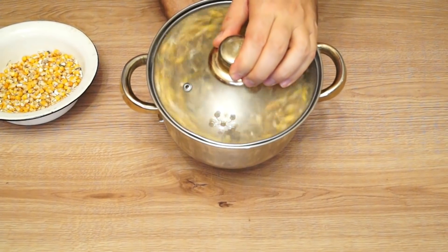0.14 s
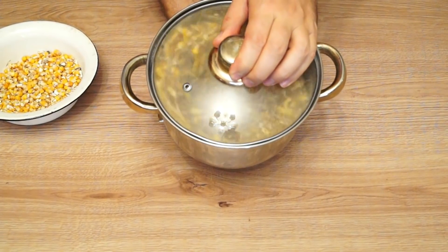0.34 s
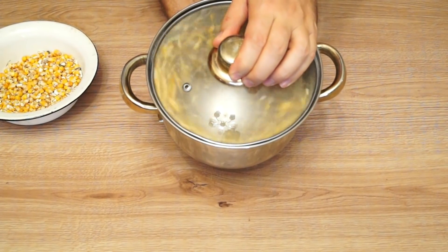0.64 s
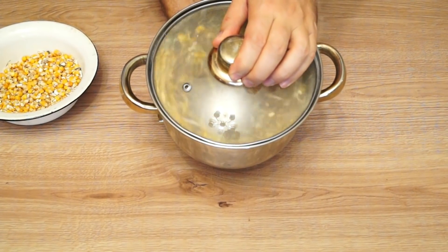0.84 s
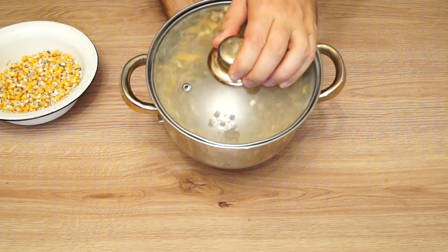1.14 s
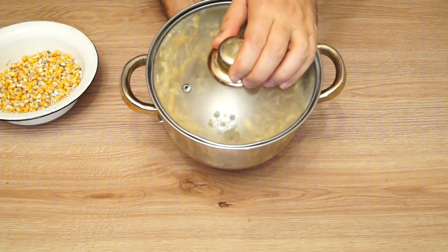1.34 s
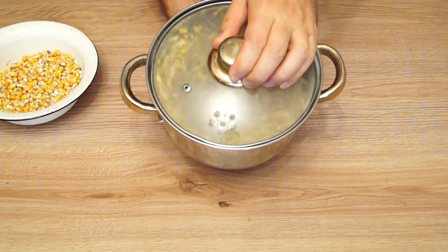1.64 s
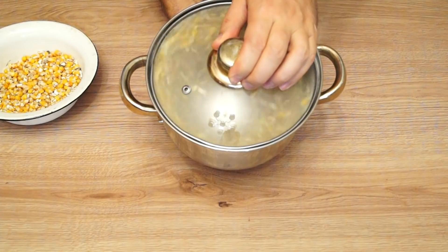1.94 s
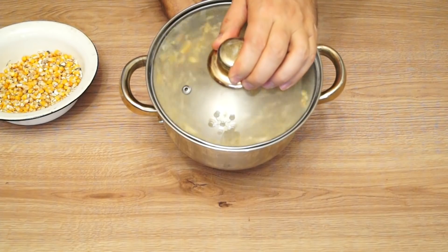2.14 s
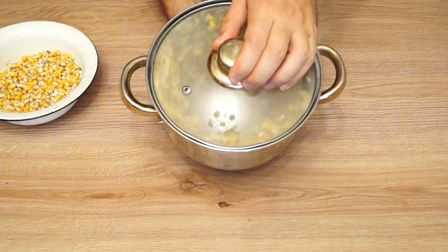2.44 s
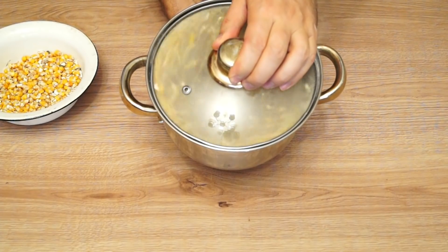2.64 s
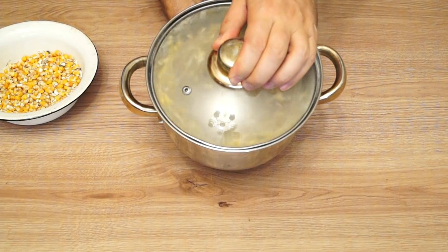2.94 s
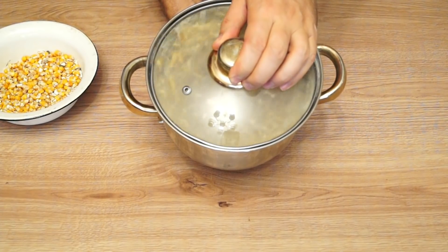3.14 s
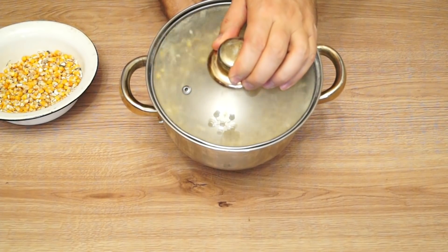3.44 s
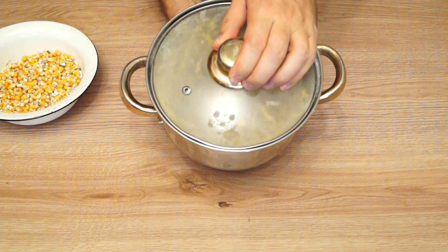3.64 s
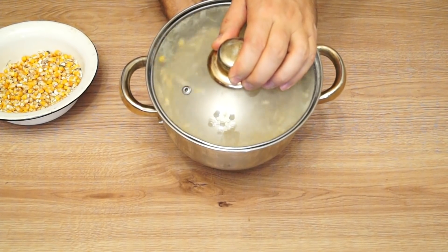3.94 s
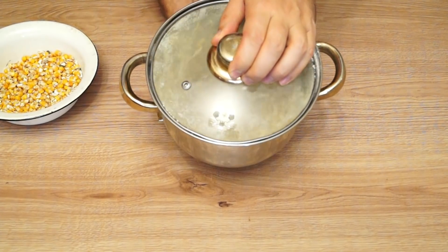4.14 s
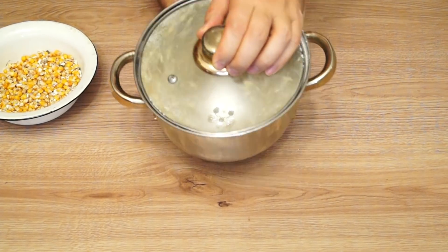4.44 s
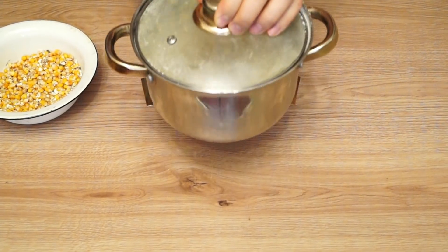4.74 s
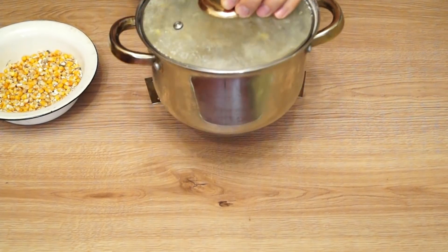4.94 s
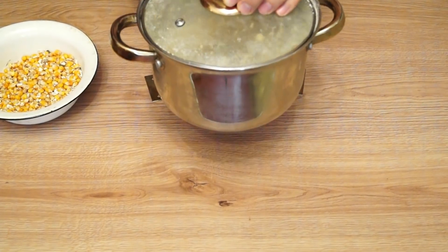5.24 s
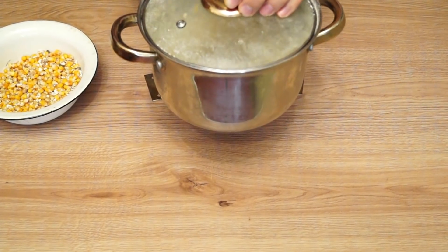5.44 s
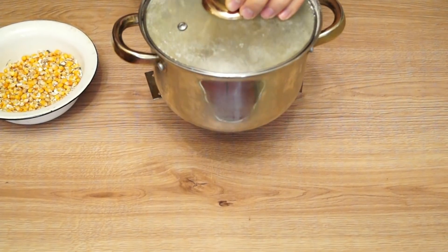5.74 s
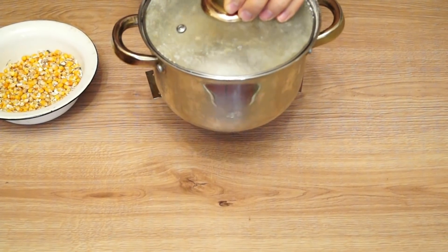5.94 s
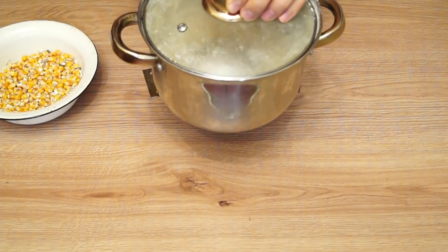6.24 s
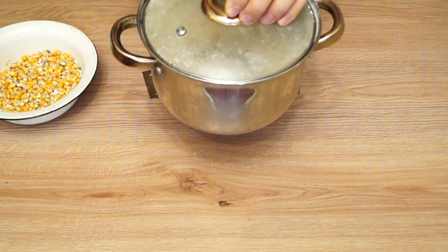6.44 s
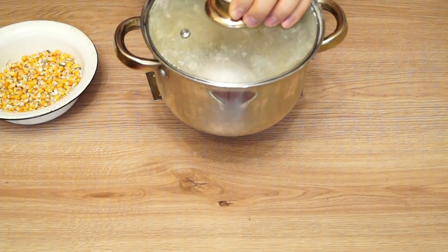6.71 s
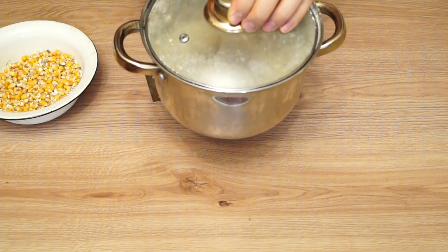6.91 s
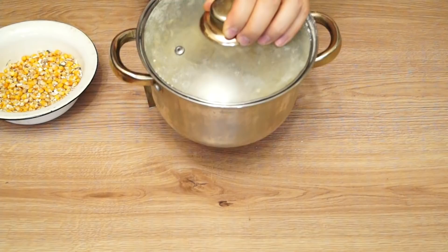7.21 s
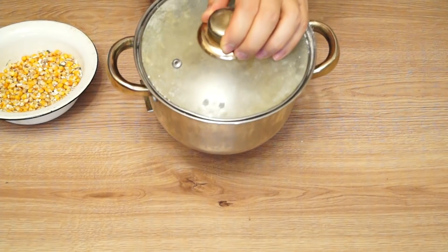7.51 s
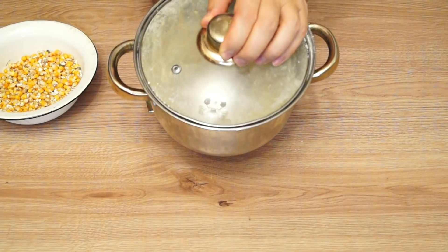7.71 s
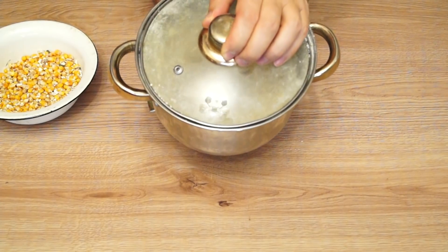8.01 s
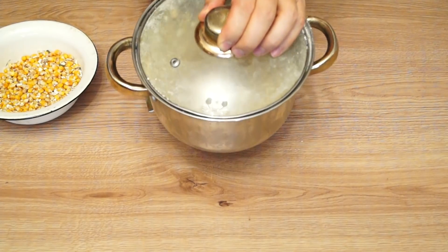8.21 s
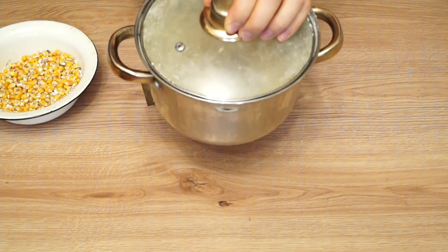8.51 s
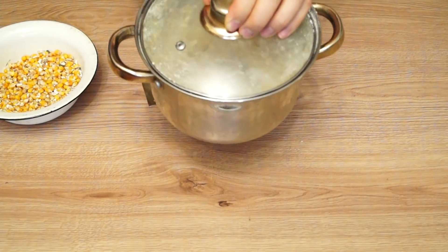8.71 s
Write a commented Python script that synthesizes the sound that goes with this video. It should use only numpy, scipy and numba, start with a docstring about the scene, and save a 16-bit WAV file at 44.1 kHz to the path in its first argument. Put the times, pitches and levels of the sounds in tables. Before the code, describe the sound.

Close up in a small room, a fast motorized blade whirls dry corn inside a lidded steel pot. Dense, bright crackling surges and dips in quick clumps, with hard ticks on metal. At about four seconds it abruptly changes to finer, duller grinding hiss, while the steel sings louder and the motor whine stands out, wavering until the end.

```python
"""In a small room, close by, an angle grinder spins a blade inside a lidded steel pot and mills dry corn. Whole
kernels surge round the wall with a bright, dense crackle; at about 4 s the scene changes to a load of fine
grit, where the steel sings out louder and the crackle dulls. Each layer of the load is a hail of random impacts
filtered by the pot's resonances. The motor's whine is a sum of drifting sines; swells, knocks, a ping and a low
hum are narrow-band noise, and dull bumps are decaying sines."""
import sys
import numpy as np
from scipy import signal
from scipy.fft import rfft, irfft
from scipy.io import wavfile
from numba import njit

SR = 44100
rng = np.random.default_rng(int(sys.argv[2]) if len(sys.argv) > 2 else 0)


def master(y):
    """Save y as 16-bit WAV."""
    cut = np.clip(np.atleast_2d(y).T, -1, 1)
    pcm = np.round(cut * 32767)  # scale
    wavfile.write(sys.argv[1], SR, pcm.astype(np.int16))


N = 391166

TIME = np.arange(N) / SR
SIZE = 16384  # samples in a filter response
FREQ = np.maximum(np.arange(SIZE // 2 + 1) * SR / SIZE, 1)
GRIT_FROM_S = 4.043
# crossovers between the frequency ranges of the layers
DRUM_HZ, SING_LO_HZ, SING_HI_HZ, CRACKLE_HZ, LID_HZ = 450, 2150, 3100, 5200, 9900


def undb(db):
    """Level definition: decibels become an amplitude ratio."""
    return 10 ** (np.asarray(db) / 20)


def unit(x):
    """Normalisation: the mean of the two ears gets rms 1."""
    return x / np.sqrt(np.mean(x.mean(axis=0) ** 2))


def curves(table):
    """Linear interpolation: the columns of a table become curves over time."""
    s, *columns = np.transpose(table)
    return [np.interp(TIME, s, column) for column in columns]


def over_freq(hz, values):
    """Logarithmic frequency scale: points are joined by straight lines on it."""
    return np.interp(np.log(FREQ), np.log(hz), values)


def walk(rate):
    """Band-limited noise: smooth chance with spread 1 that changes about rate times a second."""
    hz = np.arange(N // 2 + 1) * SR / N
    shape = (hz / rate) / (1 + (hz / rate) ** 2) ** 2
    x = irfft(rfft(rng.standard_normal(N)) * shape, N)
    return x / x.std()


def humps(table):
    """Smooth modulation: each event adds one raised-cosine hump; returns dB over time."""
    total_db = 0
    for s, length, db in table:
        phase = np.pi * np.clip((TIME - s) / length, -.5, .5)
        total_db = total_db + db * np.cos(phase) ** 2
    return total_db


def zone(lo_hz, hi_hz):
    """Crossover filtering: gain of the range between two soft edges."""
    above_lo = 1 / (1 + (lo_hz / FREQ) ** 16)
    below_hi = 1 / (1 + (FREQ / hi_hz) ** 16)
    return np.sqrt(above_lo * below_hi)


# Broad colour of the impacts. Columns: f/Hz, level with kernels/dB, level with grit/dB
COLOUR = [(30.2, -45, -43), (102, -34, -34.5), (191, -30, -24), (495, -18, -12), (1020, -19.5, -13.5),
          (1580, -13.5, -7.5), (1800, -14, -9.5), (2520, -14, -6.5), (3220, -16, -3), (4710, -10.5, -3),
          (5120, -12, -8), (9500, -3, -7), (10070, -4, -12), (15500, -3.5, -14.5)]
# Resonances of pot, lid and enclosed air.
# Columns: f/Hz, width/Hz, lift with kernels/dB, lift with grit/dB
MODES = [(200.5, 60, 10.5, 6.5), (324.5, 56, 11.5, 5), (406, 17, 10, 10), (617, 31, 3.5, 7.5),
         (554, 41, 1, 1), (686, 31, 4.5, 0.5), (855, 31, 6, 4.5), (1123, 55, 8, 8.5), (1239, 13, 6.5, 10),
         (1636, 120, -0.5, 1.5), (1970, 29, 4, 6), (2158, 55, 7.5, 8), (2304, 69, 9.5, 12),
         (2376, 50, 4, 3), (2516, 55, 2, 3.5), (2574, 156, 6.5, 8.5), (2785, 56, 4, 9.5), (2987, 42, 8, 8),
         (3140, 110, 7.5, 5.5), (3597, 21, -1, 8), (3840, 74, 4.5, 2.5), (4360, 14, 10, 12),
         (4800, 14, -4, 13), (9370, 860, 4, 0.5)]


def pot_gain(load):
    """Modal superposition: resonant peaks stand on a broad colour, for load 0 (kernels) or 1 (grit)."""
    colour = np.transpose(COLOUR)
    db = over_freq(colour[0], colour[1 + load])
    for hz, width, *lift in MODES:
        db = db + lift[load] / (1 + (2 * (FREQ - hz) / width) ** 2)
    return undb(db)


def ring(x, gain):
    """Minimum-phase response: causal filtering with this gain, so that resonances ring after each hit."""
    cepstrum = irfft(np.log(gain / gain.max() + 1e-5))
    # folding the cepstrum onto positive time makes the response causal
    cepstrum[1:SIZE // 2] *= 2
    cepstrum[SIZE // 2 + 1:] = 0
    response = irfft(np.exp(rfft(cepstrum)))
    return signal.oaconvolve(x, response)[:N]


def hail(rate, scatter_db, force_db, t60, direct=0., lag_s=.0007):
    """Shot noise: echoes of wall and lid smear random hits into short bursts, unlike in the two ears."""
    hit = rng.random(N) < rate / SR
    scatter = np.clip(rng.standard_normal(N), -2, 2)
    size = hit * undb(force_db + scatter_db * scatter)
    # energy kept from sample to sample
    keep = np.exp(-np.log(10 ** 6) / (t60 * SR))
    energy = signal.lfilter([1 - keep], [1, -keep], size ** 2 + 1e-18)
    bursts = np.sqrt(energy) * rng.standard_normal((2, N))
    # the first click itself reaches the right ear a little later
    clicks = size * rng.choice([-1, 1], N)
    return bursts + direct * np.array([clicks, np.roll(clicks, int(lag_s * SR))])


# Balance of the ears over frequency. Columns: f/Hz, left minus right level/dB
LEAN = [(100, 3.5), (300, 3), (600, 3), (1100, 0.3), (2500, 1), (4500, -0.5), (12000, -1.5)]


def radiate(impacts, gain):
    """Resonant radiation: the pot colours the impacts; its low tones lean to the left."""
    lean_db = over_freq(*np.transpose(LEAN))
    ears = [gain * undb(sign * lean_db / 2) for sign in (1, -1)]
    return unit(np.array([g.max() * ring(x, g) for x, g in zip(impacts, ears)]))


@njit
def band(x, hz, width):
    """State-variable filtering: a band-pass whose centre can move."""
    y, b, l = np.empty(len(x)), 0., 0.
    for i in range(len(x)):
        g, k = np.tan(np.pi * hz[i] / SR), width / hz[i]
        v = (b + g * (x[i] - l)) / (1 + g * (g + k))
        b, l, y[i] = 2 * v - b, l + 2 * g * v, k * v
    return y


def wander(x, centre_hz, width_hz, spread=.03, rate=14):
    """Moving excitation: contacts move over the steel, so the band that they excite drifts."""
    hz = centre_hz * (1 + spread * walk(rate))
    return unit(np.array([band(ear, hz, float(width_hz)) for ear in x]))


def waver(x, depth_s=0.00013, rate=6):
    """Delay modulation: the whirling load keeps pulling the resonances slightly out of tune."""
    when = TIME + depth_s * walk(rate)
    return np.array([np.interp(when, TIME, ear) for ear in x])


# Clumps of the load hit the wall. Columns: t/s, length/s, rise in level/dB
SURGES = [(.34, 0.058, 2), (.92, 0.18, 2), (1.13, 0.05, 2), (1.225, .06, 1.5), (1.63, 0.065, 2),
          (1.72, 0.098, 2), (1.85, 0.065, 1.5), (1.95, 0.048, 2), (2.08, .04, 0.5), (2.17, .05, 2),
          (2.28, 0.29, 1), (2.55, 0.055, 3), (2.94, 0.1, 4), (3.03, 0.23, 3), (3.125, 0.078, 1),
          (3.355, 0.077, 2.5), (3.46, 0.11, 2.5), (3.588, 0.048, 3), (3.68, .06, 2.5), (3.94, .16, 1),
          (4.57, 0.13, 1), (5.14, 0.16, 3.5), (5.88, 0.12, 2.5), (7.16, 0.19, 2.5), (7.38, 0.076, 4.5),
          (8.07, .08, 1.5)]
# The blade runs through a gap in the load. Columns: t/s, length/s, change in level/dB
LULLS = [(.165, 0.08, -3), (.56, 0.08, -3.5), (.735, 0.15, -3.2), (1.07, 0.1, -2.5), (1.18, 0.034, -0.5),
         (1.3, 0.049, -4), (1.38, 0.06, -3.5), (1.46, 0.054, -3.5), (1.59, 0.042, -1.5), (1.8, .04, -2),
         (1.895, 0.035, -3), (2.05, 0.051, -1.5), (2.118, 0.059, -4), (2.585, 0.13, -5), (2.72, 0.25, -2),
         (3.22, 0.17, -1.5), (3.405, .06, -5), (3.618, 0.049, -5), (3.835, 0.04, -1), (5.44, 0.065, -2),
         (8.14, 0.098, -1), (8.52, .12, -4)]


def flow():
    """Fluctuating mass flow: how much of the load strikes the pot, in dB about its usual amount."""
    return humps(SURGES) + humps(LULLS)


# Hard bits make the steel sing out. Columns: t/s, length/s, rise in level/dB
BURSTS = [(4.95, 0.076, 2.5), (6.23, 0.062, 4.5), (6.75, 0.065, 2), (7.47, 0.14, 2.5), (8, 0.22, 1.5)]
# The steel loses contact and its song breaks off. Columns: t/s, length/s, change in level/dB
BREAKS = [(4.31, 0.051, -5), (4.5, 0.066, -4), (4.885, 0.042, -9), (7.38, 0.048, -11), (7.84, .1, -4),
          (8.15, 0.063, -8), (8.72, .1, -5), (8.83, 0.15, -5)]


def contact():
    """Contact excitation: how firmly hard bits bear on the steel, in dB about the usual."""
    return humps(BURSTS) + humps(BREAKS)


RIPPLE_HZ = 100  # mains ripple in the motor's torque
WHINE_WOBBLE_HZ, WHINE_ROUGH = 3.5, 0.3  # spread of the pitch; irregular part of each path
WHINE_FLUTTER_DB, WHINE_FLUTTER_RATE = 2.5, 6  # level flutter, and its changes per second
WHINE_CONTACT_SHARE = 0.54  # part of a burst or break of the steel that the whine shares
# The whine sags under load; the pot lets through now the tone, now its lower side tone.
# Columns: t/s, f/Hz, tone level/dB, lower side tone level/dB (before flutter and contact)
WHINE = [(0, 2310, -59, -70), (.5, 2312, -58.5, -72), (.82, 2360, -58, -72), (1.22, 2360, -50, -58),
         (1.7, 2433, -55, -57), (2, 2364, -55, -64), (2.5, 2383, -52, -60), (2.8, 2370, -52, -64),
         (3.08, 2410, -53, -62), (3.3, 2387, -52, -53), (3.95, 2376, -50, -57), (4.03, 2384, -55, -56),
         (4.06, 2500, -41, -47), (4.4, 2500, -43, -53), (4.6, 2452, -46, -51), (4.95, 2437, -45, -44),
         (5.3, 2456, -47, -49), (5.45, 2473, -44, -48), (5.8, 2493, -43, -41), (6.07, 2472, -47, -38),
         (6.32, 2495, -40, -52), (6.75, 2483, -38, -49), (6.93, 2480, -41, -48), (7.36, 2486, -45, -42),
         (7.45, 2483, -39, -42), (7.68, 2482, -37, -53), (7.92, 2475, -39.5, -48), (8.3, 2505, -40, -46),
         (8.48, 2494, -42.5, -45), (8.6, 2476, -50, -50)]
# Further faint side tones. Columns: distance from the tone/ripple steps, level re the tone/dB
SIDE_TONES = [(1, -12.5), (2, -15), (3, -7)]


def motor():
    """Modulation sidebands: mains ripple flanks the whine with tones, carried unlike to each ear."""
    pitch_hz, tone_db, lower_db = curves(WHINE)
    pitch_hz = pitch_hz + WHINE_WOBBLE_HZ * walk(12.2)
    tones = [(0, tone_db), (-1, lower_db)]
    tones += [(step, tone_db + db) for step, db in SIDE_TONES]
    out = 0
    for step, db in tones:
        phase = 2 * np.pi * np.cumsum(pitch_hz + round(step) * RIPPLE_HZ) / SR
        paths = []
        for _ in range(2):
            rough = walk(7.5) + 1j * walk(11)
            paths.append(np.exp(0.7j * walk(1.0)) + WHINE_ROUGH * rough)
        out = out + undb(db) * np.real(np.array(paths) * np.exp(1j * phase))
    flutter_db = WHINE_FLUTTER_DB * np.clip(walk(WHINE_FLUTTER_RATE), -2, 1)
    return out * undb(WHINE_CONTACT_SHARE * contact() + flutter_db)


# reference levels: the wall rings louder as kernels break, while the crackle slowly thins
WALL_DB, WALL_DB_PER_S = -47.5, 0.84
CRACKLE_DB, CRACKLE_DB_PER_S = -34, -0.25
CRACKLE_LULL_SHARE, CRACKLE_SURGE_SHARE = 0.81, 0.34  # parts of lulls and surges in the crackle
WALL_FLOW_SHARE = 0.5  # extra part of a surge or lull felt by the wall's low modes
WHIRL_DB, WHIRL_RATE = 0.5, 11  # the load whirls unevenly: spread of the level, changes per second
# the ring climbs as kernels break into lighter pieces
RING_HZ, RING_HZ_PER_S = 2500, 20
# Short rises and dips of the bright crackle's level. Columns: t/s, length/s, change in level/dB
CRACKLE_CHANGES = [(.56, .1, 1.5), (.79, .06, 2), (1.12, 0.08, -3), (2.44, 0.068, -1), (2.59, 0.069, 3.5),
                   (2.7, 0.2, 2), (2.895, 0.087, -4), (3.07, 0.089, -3.5), (3.17, 0.17, 2.5),
                   (3.44, 0.083, -3.5), (3.775, .04, -3)]


def kernels():
    """Impact excitation: kernels fly at the wall in clumps, ring it low and high, and split with a crack."""
    wall_db = WALL_DB + WALL_DB_PER_S * TIME + flow() + WHIRL_DB * walk(WHIRL_RATE)
    crackle_db = CRACKLE_DB + CRACKLE_DB_PER_S * TIME + humps(CRACKLE_CHANGES)
    crackle_db += CRACKLE_LULL_SHARE * humps(LULLS) + CRACKLE_SURGE_SHARE * humps(SURGES)
    pot = pot_gain(0)

    blows = hail(rate=2000, scatter_db=1, force_db=1. * walk(26), t60=0.07, direct=0.35)
    blows = radiate(blows, pot * zone(DRUM_HZ, SING_LO_HZ))
    blows *= undb(wall_db - 7.5 + WALL_FLOW_SHARE * flow())

    rings = hail(rate=1300, scatter_db=1.0, force_db=1.8 * walk(10), t60=0.012, direct=0.46)
    rings = waver(radiate(rings, pot * zone(SING_LO_HZ, SING_HI_HZ)))
    rings = wander(rings, RING_HZ + RING_HZ_PER_S * TIME, width_hz=290, spread=0.043)
    rings *= undb(wall_db - 7.5)

    ticks = hail(rate=4600, scatter_db=-2.5, force_db=1.3 * walk(9.7), t60=0.11, direct=0.42)
    ticks = waver(radiate(ticks, pot * zone(SING_HI_HZ, CRACKLE_HZ)), depth_s=.0001)
    ticks *= undb(wall_db - 0.5)

    cracks = hail(rate=7000, scatter_db=3, force_db=.35 * walk(22), t60=.02)
    cracks = radiate(cracks, pot * zone(CRACKLE_HZ, SR)) * undb(crackle_db)
    return drum(pot) + hard_hits(pot) + blows + rings + ticks + cracks


# drumming on the base grows slowly with kernels, steps up at the grit, then holds
DRUM_DB, DRUM_DB_PER_S, DRUM_GRIT_DB = -66, 0.55, -60.5
DRUM_SURGE_SHARE = 0.64  # part of a surge or lull that reaches the base
# Heavy clumps drum on the base. Columns: t/s, length/s, rise in level/dB
THUDS = [(.72, .07, 3), (.89, .07, 0), (1.33, 0.052, 2), (2.26, .08, 7), (2.94, 0.11, 13), (3.5, .07, 1),
         (4.08, 0.057, 5), (4.17, 0.077, 9), (4.36, 0.69, 4.5), (5.89, .07, 2), (6.46, 0.078, 3),
         (6.77, .08, 6), (7.43, .07, 7)]


def drum(pot):
    """Cavity resonance: clumps thud on the base and stir the low modes of the enclosed air."""
    usual_db = np.where(TIME < GRIT_FROM_S, DRUM_DB + DRUM_DB_PER_S * TIME, DRUM_GRIT_DB)
    level_db = usual_db + DRUM_SURGE_SHARE * flow() + humps(THUDS)
    thuds = hail(rate=1500, scatter_db=3.0, force_db=2.0 * walk(7.0), t60=0.0087, direct=0.49)
    return radiate(thuds, pot * zone(8.3, DRUM_HZ)) * undb(level_db)


HARD_HIT_DB, HARD_HITS_PER_S = -46.5, 100  # usual level and mean rate


def hard_hits(pot):
    """Sparse impact excitation: single kernels hit the steel squarely and tick out of the crackle."""
    hits = hail(rate=HARD_HITS_PER_S, scatter_db=1.5, force_db=0, t60=0.02, direct=0.06)
    return radiate(hits, pot * zone(1005, 8430)) * undb(HARD_HIT_DB + flow())


# Narrow-band swells, knocks, a ping and a low hum, each at one frequency.
# Columns: t/s, f/Hz, nominal width/Hz, rms level before the fade/dB, length/s
SWELLS = [(0.332, 324, 40, -63, .08), (0.636, 2314, 18, -50, .09), (0.815, 2300, 28, -46, 0.089),
          (1.97, 316, 31, -56.5, .12), (2.08, 2600, 40, -52, 0.27), (2.25, 408, 21, -63.5, 1.9),
          (3, 2540, 58, -54, 0.2), (3, 1186, 290, -55, 0.29), (3.369, 329.6, 54, -63, .12),
          (4.301, 1620, 410, -51, 0.84), (3.968, 404, 29, -54.5, 0.72), (4.432, 4280, 70, -42, 0.05),
          (4.594, 4730, 500, -41, .14), (4.668, 2992, 16, -35.5, 0.052), (4.669, 325.6, 41, -52, 0.053),
          (5.221, 4820, 420, -42, 0.11), (5.377, 1190, 140, -45.5, 0.11), (5.4, 1170, 130, -53, 1.1),
          (5.696, 624, 15, -50, 0.36), (5.877, 1190, 290, -46, 0.12), (7.3, 4440, 75, -37, 0.055),
          (7.699, 614, 28, -58, 1.49), (8.654, 2295, 52, -39, 0.081), (8.84, 1786, 320, -46, 0.18)]


def swells():
    """Narrow-band noise: swells, knocks, a ping and a low hum rise and fade, each at one frequency."""
    out = np.zeros((2, N))
    for s, hz, width, db, length in SWELLS:
        near = np.flatnonzero(np.abs(TIME - s) < length / 2)
        noise = rng.standard_normal((2, 2 * SR))
        # two wider passes in series make the band steeper
        for _ in range(2):
            noise = np.array([band(ear, np.full(len(ear), float(hz)), 1.25 * width) for ear in noise])
        shape = np.cos(np.pi * (TIME[near] - s) / length) ** 2
        out[:, near] += undb(db) * shape * unit(noise[:, -len(near):])
    return out


# reference levels of the blows on the wall and the hiss of meal, lower the more the lid turns away
GRIT_WALL_DB, HISS_DB, HISS_TILT_DB = -45.5, -38, -1.63
HISS_LULL_SHARE = 0.46  # part of a lull's depth that the hiss loses
HISS_PER_SING = -0.14  # the hiss gives way while the song swells: dB of hiss per dB of song
# The pot tips back and forth, turning its lid more or less away. Columns: t/s, tilt (0 to 1)
TILT = [(4.05, 0.15), (4.45, 0), (4.75, 0.57), (5.6, 0.8), (6.6, 0.86), (7.3, 0.85), (7.85, 0.47),
        (8.45, 0.47), (8.87, 0.91)]


def grit():
    """Dense impact noise: grit scours the wall, meal hisses in gusts, duller the more the lid turns away."""
    tilt, = curves(TILT)
    wall_db = GRIT_WALL_DB + flow()
    hiss_db = HISS_DB + HISS_TILT_DB * tilt + HISS_LULL_SHARE * humps(LULLS)
    hiss_db += HISS_PER_SING * contact()
    pot, gusts = pot_gain(1), walk(15.0)

    blows = hail(rate=2500, scatter_db=3.0, force_db=1.23 * walk(12.0), t60=0.014, direct=0.13)
    blows = waver(radiate(blows, pot * zone(DRUM_HZ, SING_LO_HZ)), depth_s=0.00034)
    blows *= undb(wall_db + 1.5)

    scrapes = hail(rate=5600, scatter_db=6.5, force_db=0.88 * walk(13.0), t60=0.055)
    scrapes = waver(radiate(scrapes, pot * zone(SING_HI_HZ, CRACKLE_HZ)), depth_s=.00012)
    scrapes *= undb((wall_db + hiss_db) / 2 + 0.98 * tilt)

    meal = hail(rate=41000, scatter_db=8.0, force_db=0.95 * gusts, t60=0.024)
    meal = radiate(meal, pot * zone(CRACKLE_HZ, LID_HZ)) * undb(hiss_db - 2.0)

    # the finest sizzle leaves by the lid
    dust = hail(rate=9000, scatter_db=8.0, force_db=0.83 * gusts, t60=0.022)
    dust = radiate(dust, pot * zone(LID_HZ, SR)) * undb(hiss_db - 2.0 - 2.0 * tilt)
    return drum(pot) + singing(pot) + clatter(pot) + blows + scrapes + meal + dust


# full level, offset at the start of the grit, and time constant of the build-up
SING_DB, SING_START_DB, SING_BUILD_S = -38.5, -4.5, 0.44
# left minus right level at tilt 0, and its change at tilt 1
SING_PAN_DB, SING_PAN_TILT_DB = 1, -2.5
# Centre of the singing band. Columns: t/s, f/Hz
SONG = [(4.15, 2530), (4.7, 2490), (5.1, 2560), (5.7, 2551), (6.09, 2480), (6.4, 2575), (7.2, 2534),
        (7.7, 2622), (8.58, 2570), (8.66, 2340), (8.86, 2540)]


def singing(pot):
    """Forced resonance: harder bits make the steel sing in bursts; the song shifts as the pot moves."""
    age = np.maximum(TIME - GRIT_FROM_S, 0)
    sing_db = SING_DB + SING_START_DB * np.exp(-age / SING_BUILD_S) + contact()
    centre_hz, = curves(SONG)
    pan_db = SING_PAN_DB + SING_PAN_TILT_DB * curves(TILT)[0]
    strikes = hail(rate=3400, scatter_db=0.0, force_db=.5 * walk(26), t60=0.019, direct=0.24)
    steel = waver(radiate(strikes, pot * zone(SING_LO_HZ, SING_HI_HZ)), depth_s=.0001)
    song = wander(steel, centre_hz, width_hz=270, spread=0.019)
    return song * undb(sing_db + np.array([pan_db, -pan_db]) / 2)


CLATTER_DB, CLATTER_HZ = -47, 4640  # usual level, and centre of the band that coarse bits ring


def clatter(pot):
    """Local modal excitation: coarse bits skip over the wall and ring its upper modes, now here, now there."""
    skips = hail(rate=700, scatter_db=4, force_db=1.4 * walk(17), t60=0.029, direct=0.19)
    steel = radiate(skips, pot * zone(SING_HI_HZ, CRACKLE_HZ))
    return wander(steel, CLATTER_HZ, width_hz=770, spread=0.054) * undb(CLATTER_DB + flow())


# Dull bumps of the pot. Columns: t/s, level before onset and decay/dB
BUMPS = [(4.072, -48), (8.425, -50)]


def knocks():
    """Damped free vibration: dull bumps of the hand-held pot sound its lowest mode."""
    out = np.zeros(N)
    for s, db in BUMPS:
        age = np.maximum(TIME - s, 0)
        soft_push = 1 - np.exp(-age / 0.0019)
        decay_db = -60 * age / 0.15
        out += soft_push * undb(db + decay_db) * np.sin(2 * np.pi * MODES[0][0] * age)
    return out


def room(x, wet_db=-10, t60=0.081):
    """Reverberation: table and near walls add a short, faint tail, unlike in each ear."""
    t = np.arange(SIZE) / SR
    tail = rng.standard_normal((2, SIZE)) * np.exp(-np.log(1000) * t / t60)
    tail /= np.linalg.norm(tail, axis=1, keepdims=True)
    return x + undb(wet_db) * signal.oaconvolve(x, tail, axes=1)[:, :N]


def scene():
    """Superposition: kernels first, then grit; the motor runs throughout."""
    # equal-power crossfade over 3.8 ms
    milled = np.clip((TIME - GRIT_FROM_S) / 0.0038 + .5, 0, 1)
    load = np.sqrt(1 - milled) * kernels() + np.sqrt(milled) * grit()
    return room(load + motor() + swells() + knocks())


TOP_HZ = 15700


def record(dry):
    """Low-pass filtering: a steep elliptic filter cuts the top."""
    low_pass = signal.ellip(12, .1, 90, TOP_HZ, fs=SR, output="sos")
    return signal.sosfilt(low_pass, dry)


dry = scene()
out = record(dry)
master(out)
```